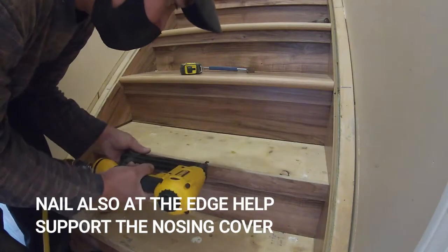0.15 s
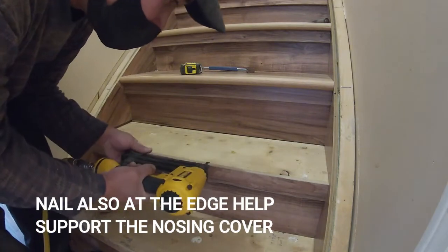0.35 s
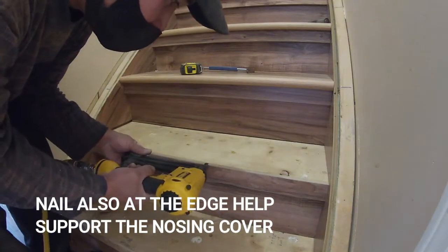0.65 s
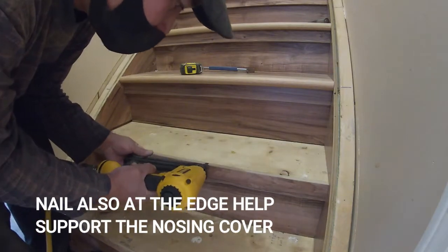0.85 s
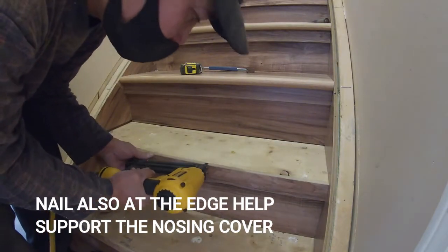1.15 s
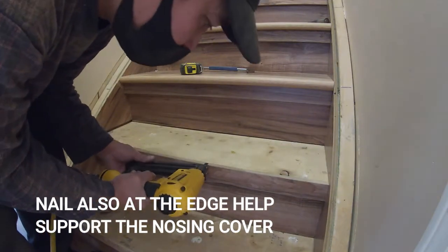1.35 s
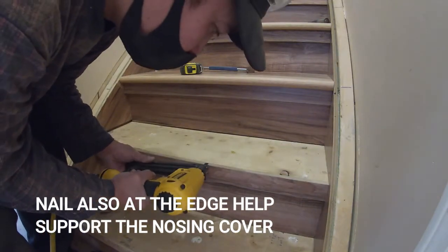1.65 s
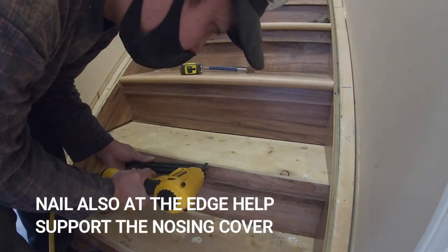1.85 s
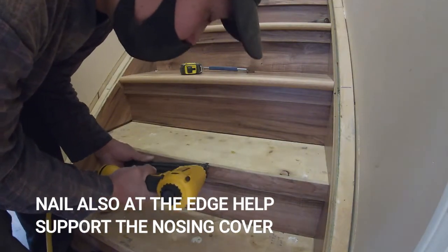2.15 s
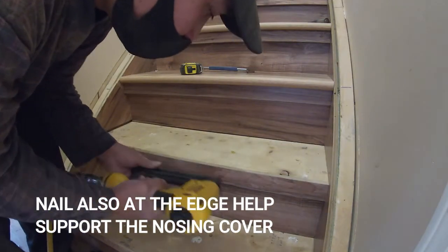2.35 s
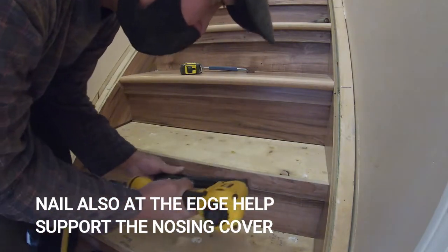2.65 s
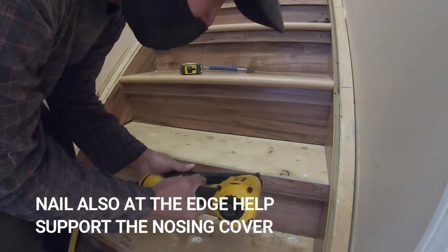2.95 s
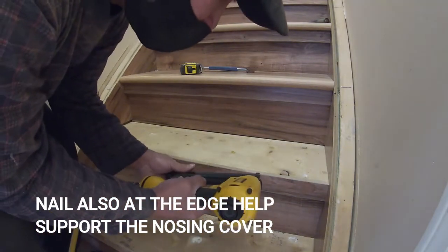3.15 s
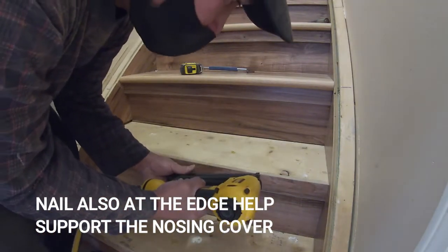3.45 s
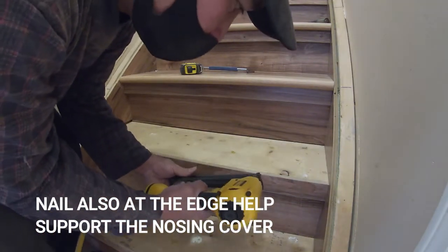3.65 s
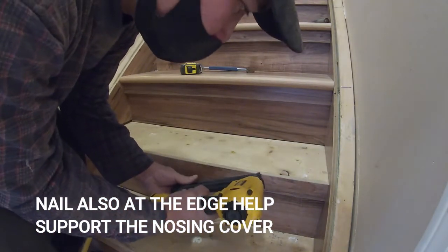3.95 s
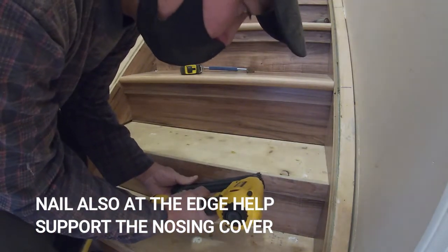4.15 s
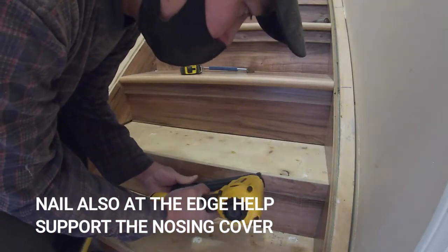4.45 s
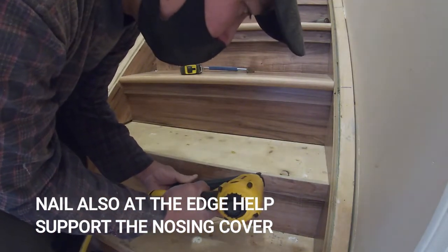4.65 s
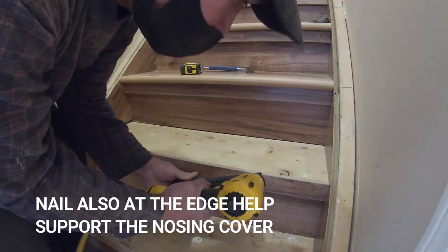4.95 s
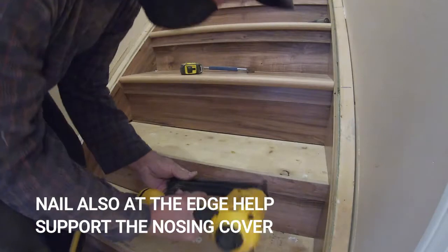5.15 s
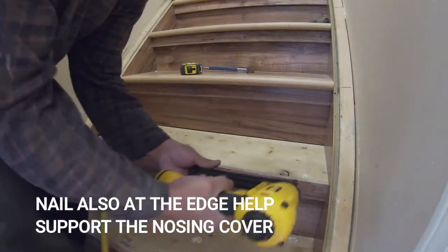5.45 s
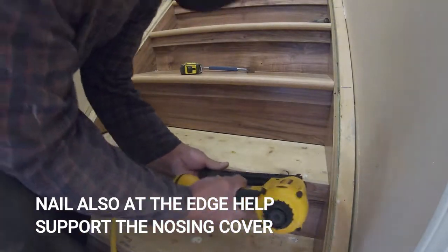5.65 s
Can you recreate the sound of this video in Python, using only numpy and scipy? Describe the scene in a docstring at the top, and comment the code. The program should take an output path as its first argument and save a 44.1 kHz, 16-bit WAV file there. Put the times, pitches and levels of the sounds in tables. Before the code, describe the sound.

From the start, an air compressor gives a soft hiss and low hum, with a thin whine that swells, fades and drifts in pitch. Two light knocks of a tool on a wooden step come at about 0.7 and 0.9 seconds. At 2 seconds a pneumatic nail gun fires close by: a loud, bright crack, followed at once by a puff of exhaust air and a low ring from the stairs. The compressor hiss drops and stays quieter. From 3 seconds there are soft thuds, small taps and a faint scrape as the tool slides along, then a firmer knock at 4.1 seconds. At 4.9 seconds comes the second shot, slightly duller with a heavier thump, another air puff and a brief clatter on the wood. Two light knocks follow around 5.3 and 5.6 seconds. The small stairwell adds a short echo.

```python
"""Nail gun in a stairwell

A pneumatic nailer fires twice into a wooden tread: air rushes in, the driver strikes, the piston hits
its bumper; a tenth of a second later it thumps back, the air vents and the stairs ring on. Between shots
the tool is slid along and set down. A compressor's hum, hiss and whine duck after each shot."""
import sys
import numpy as np
from scipy import signal
from scipy.fft import rfft, irfft
from scipy.io import wavfile

SR = 44100
rng = np.random.default_rng(int(sys.argv[2]) if len(sys.argv) > 2 else 0)


def to_wav(sig):
    """Store sig (one row per channel, or 1-D mono) as 16-bit WAV at the path in sys.argv[1].

    Samples outside -1..1 are clipped; the rate is SR.
    """
    pcm = np.clip(np.atleast_2d(sig), -1, 1) * 32767
    pcm = np.round(pcm).astype(np.int16)
    wavfile.write(sys.argv[1], SR, pcm.T)  # frames by channels


N = 255824

# shot cues: (strike time [s], inrush [dB], strike [dB], bumper time [s], bumper [dB],
# low-pass [Hz], jolt to the tread [dB])
SHOT_CUES = [(1.9967, -28.5, -9, 2.0048, -7.5, 14000, -19), (4.9156, -19, -9, 4.9248, -7, 5550, -7.5)]
# noise colours of inrushing air, driver and bumper: (frequency [Hz], level [dB])
INRUSH_EQ = [(60, 1.5), (300, 5), (700, -16), (1400, -6), (3000, -8), (5200, -8), (7000, -20.5),
             (15000, -42.5)]
STRIKE_EQ = [(100, -15), (350, 0), (720, 0.5), (880, -5), (1400, -3), (2800, -8.5), (5300, -15),
             (9500, -21), (11500, -45.5), (15500, -44)]
BUMPER_EQ = [(100, -13), (350, 8), (750, -5), (1400, -1), (3400, -0.5), (5300, -4.5), (9500, -13),
             (11500, -29.5), (15500, -36)]

def shots():
    """Air fills the cylinder, the driver cracks onto the nail, the piston slams into its bumper."""
    inrush, strike, bumper, out = noise(INRUSH_EQ), noise(STRIKE_EQ), noise(BUMPER_EQ), 0
    for s, inrush_db, strike_db, bumper_s, bumper_db, bright_hz, _ in SHOT_CUES:
        shot = from_db(inrush_db) * np.exp(-abs(since(0) - s) / .0078) * inrush
        shot += from_db(strike_db) * burst(s, rise=.00022, hold=.0035, t60=.028) * strike
        shot += from_db(bumper_db) * burst(bumper_s, rise=.00068, hold=.0035, t60=.029) * bumper
        out += cut(shot, bright_hz, "low", order=1)   # a firmly seated nose gives a duller crack
    return housing(out)


# modes of the shell and magazine: (frequency [Hz], level [dB], t60 [s])
HOUSING_MODES = [(754, -1, 0.024), (1052, 0.5, 0.037), (1396, -0.5, 0.055), (1484, 0, .05),
                 (1880, -0.5, .03), (1985, 1.5, 0.053), (2230, 0.5, .04), (2380, 0, 0.067),
                 (2540, -3, 0.063), (3058, -0.5, .025), (3444, 1, 0.021), (4120, 1.5, 0.026),
                 (4710, 1, .02), (5120, -1.5, .02), (5900, -1.5, 0.019), (6550, -2.5, .02)]

def housing(hit):
    """The dry hit plus the short ring of the tool's shell."""
    return from_db(-.5) * hit + from_db(-5.5) * ring(hit, HOUSING_MODES)


# exhaust cues: (time [s], chirp [dB], jet [dB], jet t60 [s], bleed [dB], bleed span [s], clatter [dB])
VENT_CUES = [(2.0836, -12, -17.5, .28, -29, .195, -16), (5.0242, -14, -21, .24, -31, .12, -5)]
# noise colours of valve chirp, jet and bleed: (frequency [Hz], level [dB])
CHIRP_EQ = [(300, -16), (1700, -13.5), (3000, -5.5), (4300, -2), (5900, -9), (7000, -27), (15000, -47.5)]
JET_EQ = [(200, -3), (1000, -15.5), (2500, -9), (4200, -4), (6500, -2), (8500, -5), (10200, -6),
          (11300, -17.5), (14000, -23), (16000, -27)]
BLEED_EQ = [(88, -34.5), (150, -1.5), (175, 3.5), (213, -10), (253, 0.5), (279, -15.5), (332, -4),
            (796, -20.5), (1630, -15.5), (2180, -18.5), (6350, -20), (9540, -41), (15500, -70)]

def vents():
    """The valve chirps open, a bright jet escapes, and the last air bleeds off in a duller tail."""
    chirp, jet, bleed = 0, 0, 0
    for s, chirp_db, jet_db, jet_t60, bleed_db, bleed_s, _ in VENT_CUES:
        chirp += from_db(chirp_db) * burst(s, rise=.0012, hold=.0025, t60=.026)
        jet += from_db(jet_db) * burst(s + .004, rise=.0034, hold=.011, t60=jet_t60)
        bleed += from_db(bleed_db) * burst(s, rise=.006, hold=bleed_s * .79, t60=.46)
    flutter = from_db(.7 * drift(90))
    chirp *= noise(CHIRP_EQ)
    jet *= standing_waves(noise(JET_EQ), depth_db=3.5)
    bleed *= standing_waves(noise(BLEED_EQ), depth_db=1.5)
    air = chirp + flutter * (jet + bleed)
    return air + from_db(-6.5) * resonance(air, hz=4290, t60=.014)   # the exhaust port's own pitch


# hits on the wood: (delay after the cue [s], level [dB], pitch [Hz], t60 [s])
NAIL_HITS = [(.0002, -3.5, 1190, .004), (.001, -3, 172, .048)]   # the nail punches in
JOLT_HITS = [(.0032, 4.5, 318, .025), (.0119, -1, 140, .05), (.0121, -4, 442, .024)]   # the tool kicks as the piston stops
RECOIL_HITS = [(.0061, -1.5, 110, .06), (.064, -20, 94, .15)]   # it drops back and settles
CLATTER_HITS = [(.007, -1, 485, .02), (.039, -6.5, 370, .038), (.04, -9, 158, .07), (.087, -16, 141, .12)]   # it bounces as it lands
# the nose is set down: (time [s], knock [dB], pitch [Hz], click [dB], click pitch [Hz], rumble [dB])
KNOCK_CUES = [(.65, -32, 250, -42.5, 5900, -52), (.916, -30, 205, -39.5, 2600, -49),
              (1.856, -55, 260, -42, 3600, -72), (3.083, -41, 245, -49, 2600, -57),
              (3.621, -34.5, 250, -46.5, 850, -61), (3.81, -42, 260, -55, 2200, -65),
              (4.0743, -20.5, 297, -32, 620, -34.5), (5.325, -40, 180, -64, 800, -55),
              (5.565, -35, 190, -52, 620, -52)]
# the run of contacts in one knock: (delay [s], level [dB], pitch [x knock pitch], t60 [s])
NOSE_HITS = [(0, 0, 1, .034), (.0017, -.5, 2.07, .031), (.0077, 0, 1.51, .028)]
# weight shifts on the stair: (time [s], thud [dB], pitch [Hz], rumble swell [dB])
THUD_CUES = [(.79, -44, 64, -50), (2.96, -48, 90, -64), (3.034, -37, 85.5, -62), (3.061, -33, 85, -56),
             (4.092, -28, 105, -54)]
# modes of the staircase: (frequency [Hz], level [dB], t60 [s])
STAIR_MODES = [(29.1, 0.5, 1.7), (37.6, 1, 2.7), (44.84, 2, 1.4), (83.56, -6.5, 0.64), (98.7, 0.5, .42),
               (109, -4.5, 0.5), (150.5, 0, .5), (171.9, 2.5, 0.65), (190.7, -3.5, .4), (223.4, -5.5, 0.4),
               (249.9, -0.5, .65), (304, -4, 0.14), (345, -7.5, .4), (388, -4.5, .4), (417, -3.5, 0.21),
               (462, -2.5, 0.29), (545, -9, .45), (605, -5, .4), (735, -6, .3)]

def tread():
    """Shots, recoils, knocks and shifting weight bend the tread and set the whole staircase ringing."""
    force = sum(blow(s, 0, NAIL_HITS) + blow(s, db, JOLT_HITS) for s, *_, db in SHOT_CUES)
    force += sum(blow(s, 0, RECOIL_HITS) + blow(s, db, CLATTER_HITS) for s, *_, db in VENT_CUES)
    force += sum(blow(s, db, np.array(NOSE_HITS) * [1, 1, hz, 1]) for s, db, hz, *_ in KNOCK_CUES)
    thud_t60 = .11
    force += sum(blow(s, db, [(0, 0, hz, thud_t60)]) for s, db, hz, _ in THUD_CUES)
    return cut(force, hz=45.2, kind="high", order=1) + ring(force, STAIR_MODES)


def blow(s, db, hits):
    """Each contact of a blow bends the tread for a few swings."""
    out = 0
    for delay, hit_db, hz, t60 in hits:
        swing = np.sin(2 * np.pi * hz * since(s + delay))
        out += from_db(db + hit_db) * swing * burst(s + delay, rise=.0001, hold=0, t60=t60)
    return out


# noise colours of the sliding nose and the rumbling tread: (frequency [Hz], level [dB])
RUB_EQ = [(300, -8), (700, -1.5), (1700, -11.5), (2600, 1), (3300, -5), (4500, -18), (6500, -38),
          (12000, -55)]
RUMBLE_EQ = [(25, -16), (60, -10), (110, -4), (180, 3), (280, -8.5), (450, -9), (800, -19.5), (2000, -43),
             (8000, -75.5)]
# sleeve moves: (time [s], level [dB])
RUSTLE_CUES = [(.03, -60), (.2, -60), (1.27, -60)]

def handling():
    """The nose clicks on the wood, leaves a rumble and rubs unevenly along it; a sleeve rustles."""
    white, clicks, crack = rng.standard_normal(N), 0, 0
    spread = 1.55   # a click's band reaches this factor above and below its pitch
    rumble = sum(from_db(db) * swell(s, half=.09) for s, *_, db in THUD_CUES)
    for s, knock_db, _, click_db, hz, rumble_db in KNOCK_CUES:
        touch = burst(s, rise=.0006, hold=.003, t60=.041)
        click = rms_one(cut(white, [hz / spread, hz * spread], "band", order=3))
        clicks += from_db(click_db) * touch * click
        crack += from_db(-.5 + 2.2 * knock_db) * touch   # a hard knock also cracks
        rumble += from_db(rumble_db) * burst(s, rise=.008, hold=.04, t60=.55)
    clicks += crack * rms_one(cut(white, hz=[1500, 4600], kind="band"))
    rub = from_db(-49 + 2.7 * drift(60)) * swell(s=3.735, half=.105) * noise(RUB_EQ)
    sleeve = sum(from_db(db) * swell(s, half=.08) for s, db in RUSTLE_CUES)
    rustle = sleeve * from_db(3 * drift(40)) * rms_one(cut(white, hz=[5000, 8000], kind="band"))
    rumble *= from_db(1.8 * drift(30)) * noise(RUMBLE_EQ)
    return cut(clicks, hz=10000, kind="low") + rub + rustle + rumble


def shudder():
    """The boards shake for a moment after each shot, the more so after a hard jolt."""
    shaking = sum(from_db(jolt_db - 13) * burst(s, rise=.008, hold=.16, t60=.42)
                  for s, *_, jolt_db in SHOT_CUES)
    return shaking * cut(noise(RUMBLE_EQ), hz=[230, 460], kind="band")


# noise colours of low hum, mid hiss and top-end spray: (frequency [Hz], level [dB])
HUM_EQ = [(25, -15), (60, -16.5), (115, -17), (155, 1), (230, 0.5), (290, -1), (370, 0.5), (440, -4),
          (510, -11), (800, -17), (2000, -56)]
HISS_EQ = [(200, -22), (500, -7.5), (720, -1.5), (900, -1.5), (1400, -1), (1900, -6.5), (2800, -9),
           (4300, -8.5), (5300, -20.5), (6500, -40.5), (10000, -57.5)]
SPRAY_EQ = [(3000, -26), (4500, 2), (5600, -1.5), (7500, -7), (8500, -13), (10200, -17), (11500, -35),
            (15500, -32)]
# machine tones: (frequency [Hz], level against the hum [dB])
HUM_TONES = [(160, -13), (225, -13.5), (270, -16.5), (359, -3), (593, -12), (826, -9.5), (1255, -21.5),
             (2121, -21), (2690, -26)]
# resonances of the rushing air: (frequency [Hz], level [dB], t60 [s])
AIR_MODES = [(840, 2.5, 0.063), (980, -5.5, .04), (1227, -6, 0.022), (1462, -9.5, .02), (2065, -8.5, 0.022),
             (2858, -13, 0.0206)]
# each layer's level ride: (level [dB], dip [dB], recovery [s], lasting drop after the first shot [dB])
HUM_RIDE = (-54, 9.5, .5, -2.3)
HISS_RIDE = (-40.5, 8.5, .27, 11)
SPRAY_RIDE = (-54.3, 19, 1.35, 12.2)

def compressor():
    """The bed: a low hum with wavering tones, under air that rushes through broad resonances."""
    tones = 0
    for hz, db in HUM_TONES:
        tones += from_db(db + 2 * drift(3.1)) * np.sin(2 * np.pi * hz * since(0) + .82 * drift(10))
    hum = from_db(ducked(*HUM_RIDE)) * (noise(HUM_EQ) + tones)
    rush = noise(HISS_EQ)
    rush += ring(rush, AIR_MODES)
    hiss = from_db(ducked(*HISS_RIDE) + .5 * drift(12)) * standing_waves(rush, depth_db=2.17)
    spray = from_db(ducked(*SPRAY_RIDE) + .6 * drift(8)) * standing_waves(noise(SPRAY_EQ), depth_db=1.8)
    return hum + hiss + spray


# the motor's pitch, sagging under load: (time [s], fundamental [Hz], 6th partial [dB])
WHINE_CURVE = [(.4, 735, -66), (.58, 723, -52), (.83, 707.5, -45), (1.0, 702, -49.5), (1.3, 692, -46),
               (1.5, 691, -53.5), (1.95, 692, -58), (2.5, 708, -62), (2.85, 721, -74), (3.03, 722.5, -60.5),
               (3.27, 720, -53), (3.47, 719, -62), (3.75, 708.4, -52.5), (3.95, 704, -64), (4.3, 697, -63),
               (4.55, 689.5, -57), (5.3, 680, -74), (5.8, 678, -68)]
# overtones that follow the spray: (harmonic [x fundamental], level against the spray [dB])
WHINE_OVERTONES = [(7, -14), (9, -26), (11, -16), (12, -21)]

def whine():
    """High partials of the motor swell and fade as it glides; the sixth is rough."""
    hz, sixth_db = in_time(WHINE_CURVE)
    phase = 2 * np.pi * np.cumsum(hz * (1 + .0009 * drift(25))) / SR
    flare_hz, width_hz = 3453, 14   # the weaker fifth flares as it glides through this resonance
    flare_db = 11.5 / (1 + ((5 * hz - flare_hz) / width_hz) ** 2)
    fifth = from_db(sixth_db - 11 + flare_db + 1.3 * drift(6)) * np.sin(5 * phase)
    sixth = from_db(sixth_db + 1.8 * drift(5.4)) * np.sin(6 * phase)
    roughness = 1 + from_db(-7) * drift(64)
    spray_db = ducked(*SPRAY_RIDE)
    overtones = sum(from_db(spray_db + db + 2.3 * drift(5)) * np.sin(k * phase)
                    for k, db in WHINE_OVERTONES)
    return np.sqrt(2) * (fifth + sixth * roughness) + overtones


def ducked(level_db, dip_db, recovery, drop_db):
    """Level in dB of a layer that sinks after each shot and creeps back toward a new resting level."""
    sink_s = .63
    times = [s for s, *_ in SHOT_CUES]
    sinking = [np.minimum(since(s) / sink_s, 1) for s in times]
    dips = [down * np.exp(-since(s + sink_s) / recovery) for down, s in zip(sinking, times)]
    return level_db - dip_db * np.max(dips, axis=0) - drop_db * sinking[0]


# reverb decay of the stairwell: (frequency [Hz], t60 [s])
ROOM_DECAY = [(60, 0.53), (200, 0.56), (500, 0.82), (1500, 0.78), (4000, .6), (8000, 0.39), (15000, .3)]

def stairwell(x, build_up):
    """Dense reflections from close walls; each octave dies at its own pace."""
    t = np.arange(SR) / SR
    edges = 45 * 2 ** np.arange(10.)
    echo = 0
    for low, high in zip(edges, edges[1:]):
        t60 = at_hz(ROOM_DECAY, np.sqrt(low * high))
        fade = from_db(-60 * t / t60) * (1 - np.exp(-t / build_up))
        echo += cut(rng.standard_normal(SR), [low, high], "band") * fade / np.sqrt(np.sum(fade ** 2))
    return signal.fftconvolve(x, echo)[:N]


def standing_waves(x, depth_db):
    """A small room lifts some pitches of a still source and sinks others; rms 1."""
    hz = np.arange(N // 2 + 1) * SR / N
    knots_hz = np.arange(0, SR, 22)
    swings = np.clip(rng.standard_normal(len(knots_hz)), -2, 1.4)
    ripple = np.interp(hz, knots_hz, swings) * np.minimum(hz / 1000, 1)   # shallower in the bass
    return rms_one(irfft(rfft(x) * from_db(depth_db * ripple), N))


def from_db(db):
    """Decibels to gain."""
    return 10 ** (np.asarray(db) / 20)


def rms_one(x):
    """Scale to rms 1."""
    return x / np.sqrt(np.mean(x ** 2) + 1e-20)


def since(s):
    """Seconds gone by since s; zero before."""
    return np.maximum(np.arange(N) / SR - s, 0)


def in_time(rows):
    """Each column of an automation curve at every sample."""
    s, *columns = np.transpose(rows)
    return [np.interp(since(0), s, c) for c in columns]


def at_hz(points, hz):
    """Read a table on a log-frequency axis."""
    f, value = np.transpose(points)
    return np.interp(np.log(hz + 1e-9), np.log(f), value)


def cut(x, hz, kind, order=2):
    """Butterworth filter."""
    sos = signal.butter(order, np.clip(hz, 10, .45 * SR), kind, fs=SR, output="sos")
    return signal.sosfilt(sos, x + 1e-18)


def noise(spectrum):
    """Steady noise of a given colour, rms 1."""
    colour = from_db(at_hz(spectrum, np.arange(N // 2 + 1) * SR / N))
    return rms_one(irfft(rfft(rng.standard_normal(N)) * colour, N))


def drift(rate):
    """Random modulation, rms 1, changing about rate times a second."""
    return noise([(rate, 0), (rate * 10, -50), (rate * 100, -160)])


def burst(s, rise, hold, t60):
    """Attack, hold and decay envelope starting at s; all in seconds."""
    return (1 - np.exp(-since(s) / rise)) * from_db(-60 * np.minimum(since(s + hold) / t60, 4))


def swell(s, half):
    """Bell-shaped envelope peaking at s, with a half-width in seconds."""
    return np.exp(-np.minimum(((since(0) - s) / half) ** 2, 50))


def resonance(x, hz, t60):
    """One mode, gain 1 at its peak."""
    r = from_db(-60 / (t60 * SR))
    feedback = [1, -2 * r * np.cos(2 * np.pi * hz / SR), r * r]
    return signal.lfilter((1 - r * r) / 2 * np.array([1, 0, -1]), feedback, x + 1e-18)


def ring(x, modes):
    """A bank of modes driven by x."""
    return sum(from_db(db) * resonance(x, hz, t60) for hz, db, t60 in modes)


def scene():
    """Tool, stair and compressor, mixed in mono; tool and stair feed the reverb."""
    tool = shots() + vents() + handling()
    wood = tread()
    boom = cut(wood, hz=[110, 280], kind="band", order=1)   # boxed-in steps radiate best in upper bass
    room = stairwell(from_db(-10) * tool + from_db(-6.5) * boom, build_up=.006)
    floor = from_db(-95) * rng.standard_normal(N)
    mono = tool + wood + shudder() + room + compressor() + whine() + floor
    return np.array([mono, mono])


def record(dry):
    """A soft clip rounds the loudest peaks and a steep low-pass trims the top."""
    ceiling, cutoff_hz = .95, 15300
    rounded = dry / (1 + (dry / ceiling) ** 6) ** (1 / 6)
    return signal.sosfilt(signal.ellip(10, .1, 80, cutoff_hz, fs=SR, output="sos"), rounded)


dry = scene()
out = record(dry)
to_wav(out)
```